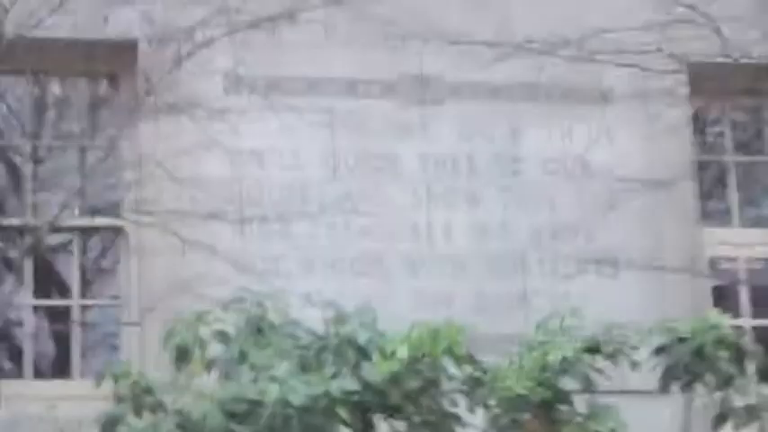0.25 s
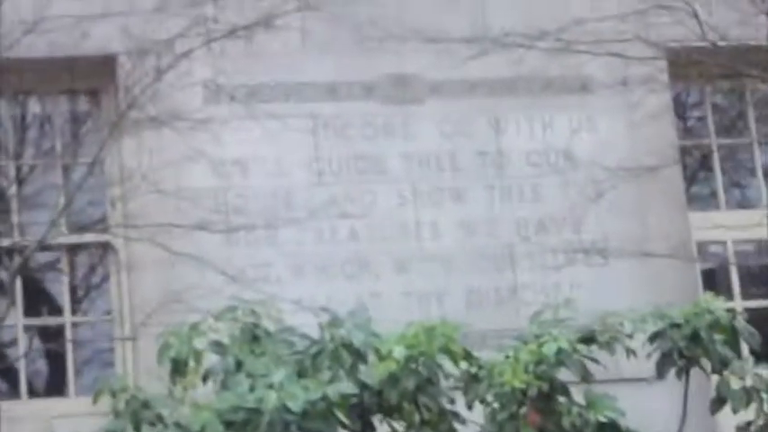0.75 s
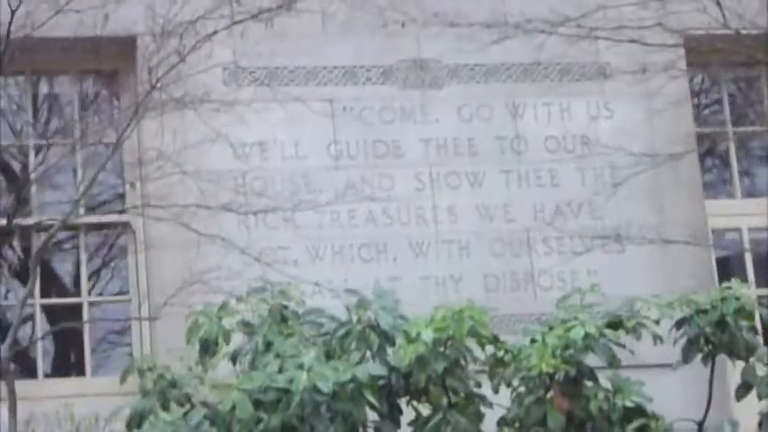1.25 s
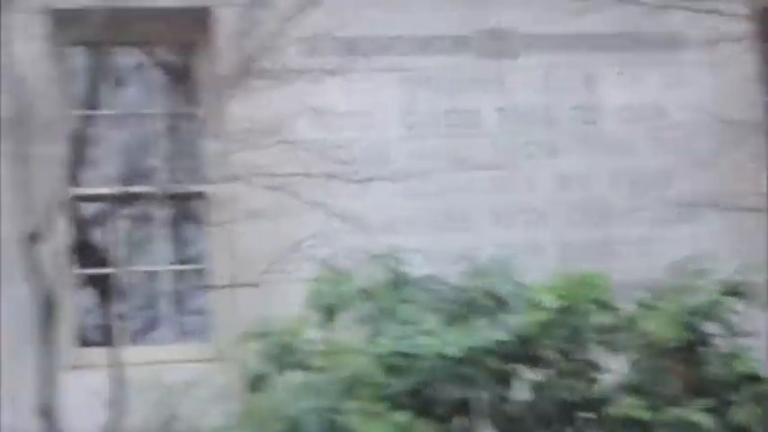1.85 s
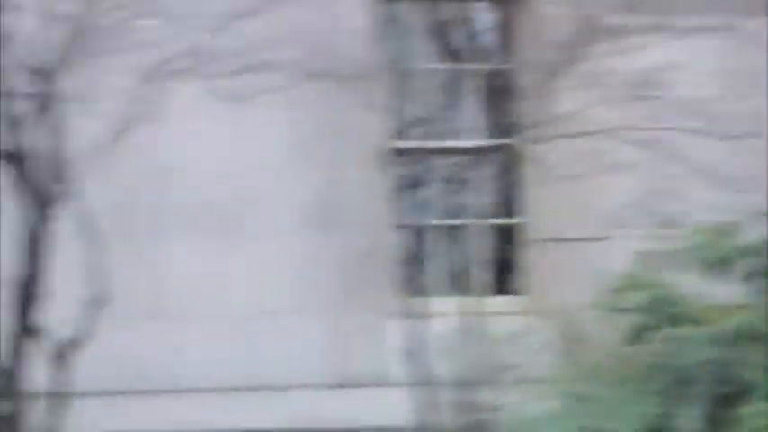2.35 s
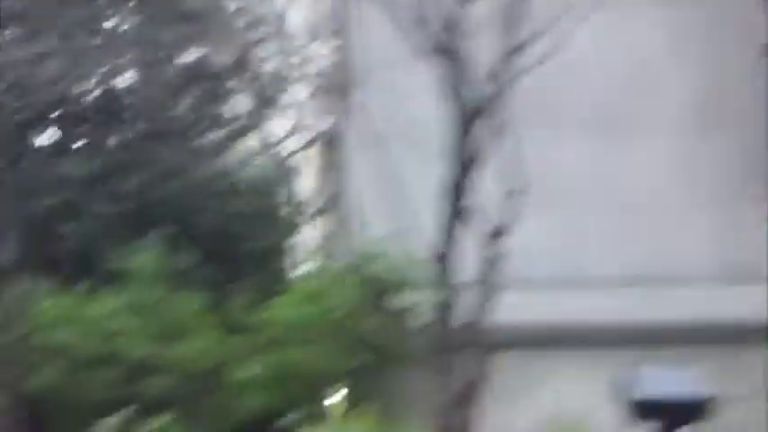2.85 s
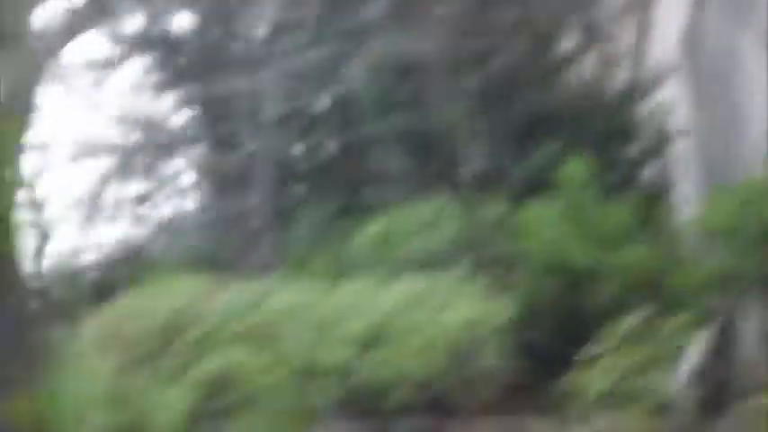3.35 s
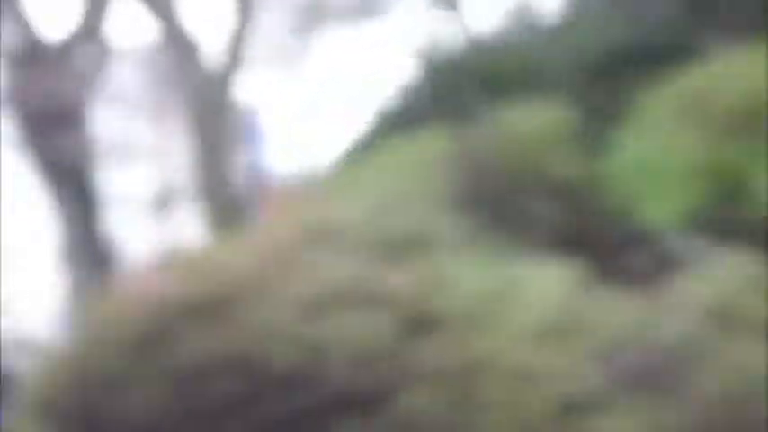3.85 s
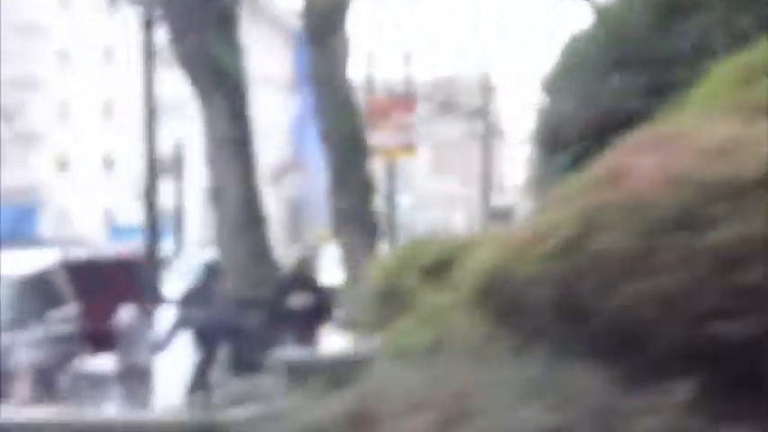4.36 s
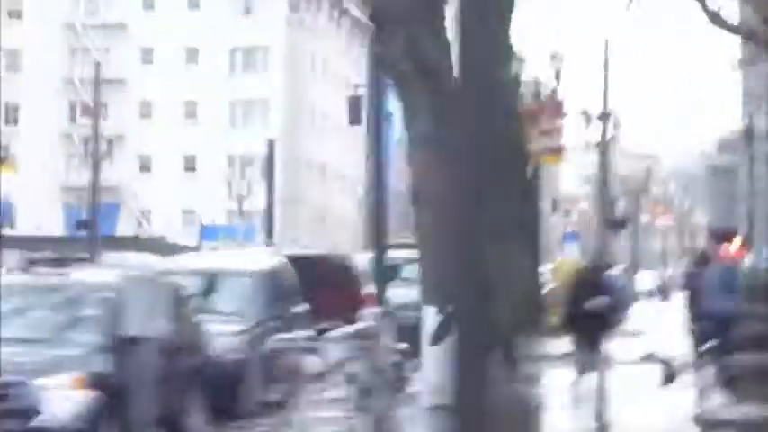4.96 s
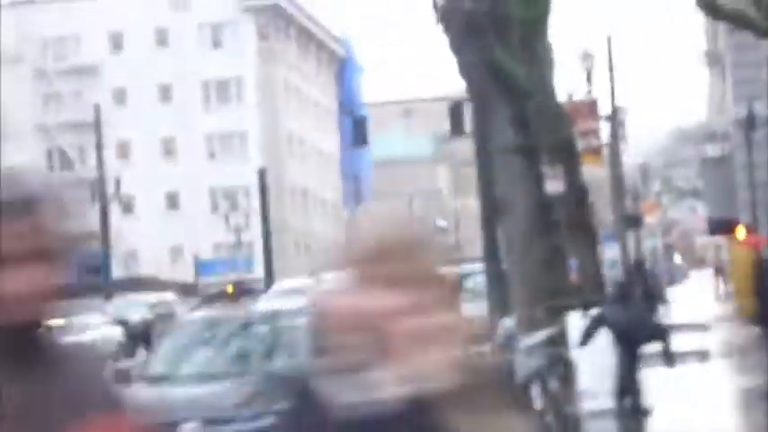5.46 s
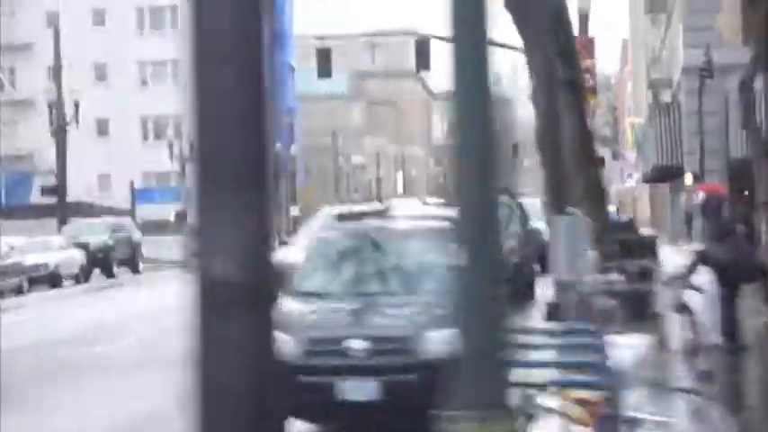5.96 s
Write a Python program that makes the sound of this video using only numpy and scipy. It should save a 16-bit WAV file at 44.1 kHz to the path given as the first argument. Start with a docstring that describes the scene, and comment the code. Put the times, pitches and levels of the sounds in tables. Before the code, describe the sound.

Nearly silent for the first 0.1 s, the sound fades in by 0.3 s to a deep, steady V8 idle, with a second vehicle humming very low nearby. Light clacks on pavement at 0.5-1.0 s surround a sharp tap with a hollow thump at 0.6 s. From 1.25 s the engine climbs quickly and works hard, its exhaust burbling, with rumble, rasp and a droning fan. Knocks recur near 2.0, 3.4, 4.8 and 6.1 s, the later ones weaker. Close plastic ticks fall at 2.3, 2.6 and 3.4 s, with a small creak at 4.1 s and more snaps to 5.9 s. The engine revs higher until 3.75 s, eases around 4.2-5 s, then rises again. Wet hiss swells near 3.6 s and broadly around 5.1 s, with brief fizzing splashes; clacks at 4.5-4.8 s echo off the house fronts. Hiss and engine continue to the end.

```python
"""A V8 idles in a wet city street, then pulls away with a burbling exhaust and a droning fan.
Sines make the engine, the fan and a second idling engine; shaped noise makes the engine's rumble and rasp.
Patchy noise swells and sinks, as from tyres on the wet road or the engine's own rasp, with small splashes.
A hollow knock of fading sines repeats slowly, and a few clacks of noise echo off the house fronts.
The hand-held camera ticks as it is turned: short fading sines and bright cracks of noise."""
import sys
import numpy as np
from scipy import signal
from scipy.fft import rfft, irfft, next_fast_len
from scipy.io import wavfile
from scipy.ndimage import uniform_filter1d, map_coordinates

SR = 44100
rng = np.random.default_rng(int(sys.argv[2]) if len(sys.argv) > 2 else 0)


def generate_wav(sig):
    """Save sig (samples, or channels by samples) to the path in sys.argv[1] as 16-bit PCM at SR."""
    pcm = np.round(np.clip(np.atleast_2d(sig).T, -1, 1) * 32767).astype(np.int16)
    wavfile.write(sys.argv[1], SR, pcm)


N = 274302

IDLE_HZ = 49.2  # firing rate at idle

# low rumble of engine and road: (frequency [Hz], relative level [dB per Hz])
RUMBLE_SPECTRUM = [(15, -39), (32, -16.5), (52, -7), (95, -4.5), (160, 1), (230, -5.5), (330, -25.5),
                   (700, -44.5)]
# midrange of engine rasp and road roar: (frequency [Hz], relative level [dB per Hz])
ROAR_SPECTRUM = [(120, -22), (260, -0.5), (350, 0), (460, -4.5), (600, -2.5), (780, -6), (1200, -11.5),
                 (1800, -15.5), (4000, -42.5)]
# fizz of water: (frequency [Hz], relative level [dB per Hz])
SPRAY_SPECTRUM = [(2000, -35), (3600, 0.5), (4500, 3), (5400, 0.5), (6400, 0.5), (7000, -5.5),
                  (8000, -10.5)]
# bright edge of clacks and ticks: (frequency [Hz], relative level [dB per Hz])
CRACK_SPECTRUM = [(300, -16), (1000, -15), (2500, 4.5), (4500, 0.5), (6700, 1.5), (8000, -9.5)]


def amp(db):
    """Turn decibels into a gain."""
    return 10 ** (np.asarray(db) / 20)


def unit(x):
    """Scale x to an rms (average strength) of 1."""
    return x / np.sqrt(np.mean(x ** 2) + 1e-20)


def along(points, hz):
    """Read a table of (frequency [Hz], value) at any frequency, on a log axis."""
    f, v = np.transpose(points)
    return np.interp(np.log(hz + 1), np.log(f + 1), v)


def curves(rows):
    """Draw one value per sample for each column after the time."""
    s, *cols = np.transpose(rows)
    return [np.interp(np.arange(N) / SR, s, c) for c in cols]


def wobble(rate):
    """A smooth random curve through `rate` random points a second."""
    points = rng.standard_normal(int(N * rate / SR) + 4)
    return map_coordinates(points, [np.arange(N) * rate / SR])


def filtered(x, response):
    """Multiply the spectrum of x by a response, given as a function of frequency."""
    m = next_fast_len(N + SR // 2)
    hz = np.fft.rfftfreq(m, 1 / SR)
    return irfft(rfft(x, m) * response(hz), m)[:N]


def coloured(x, spectrum):
    """Shape x by a spectrum table and bring it to rms 1."""
    return unit(filtered(x, lambda hz: amp(along(spectrum, hz))))


def rush(spectrum, patchy_db):
    """Noise of rms 1 whose gain varies in random patches of time and pitch."""
    z = signal.stft(rng.standard_normal(N), nperseg=1024)[2]
    patches = uniform_filter1d(rng.standard_normal(z.shape), size=9, axis=0)
    patches = uniform_filter1d(patches, size=8, axis=1)
    noise = signal.istft(z * amp(patchy_db * unit(patches)))[1][:N]
    return coloured(noise, spectrum)


def fade(t, t60):
    """A steady decay that loses 60 dB in t60 seconds."""
    return np.exp(-np.log(1000) * t / t60)


def tone(phase):
    """A sine of rms 1 that starts anywhere in its cycle."""
    return np.sqrt(2) * np.sin(phase + rng.uniform(0, 2 * np.pi))


def ring(modes, t):
    """A struck body rings at several pitches, each fading, with slightly new strengths each time."""
    scatter_db = 1.2
    out = 0
    for hz, db, t60 in modes:
        strength = amp(db + scatter_db * rng.standard_normal())
        out = out + strength * fade(t, t60) * np.sin(2 * np.pi * hz * t)
    return out


def add(track, s, sound):
    """Mix a sound into the track at time s, in seconds."""
    part = track[round(s * SR):][:len(sound)]
    part += sound[:len(part)]


def drive():
    """The driver's part: the engine's firing rate in Hz and how hard it works in dB."""
    pull_away_s = 1.25  # the firing rate starts to climb
    # engine speed once under way: (time [s], firing rate [Hz])
    speed = [(1.32, 52.6), (1.45, 59.0), (1.55, 63.6), (1.65, 65.2), (1.81, 67.1), (2.39, 63.6),
             (2.83, 66.2), (3.1, 72.4), (3.75, 78.6), (4.2, 73.4), (4.95, 73.0), (5.3, 79.8), (5.56, 79.8),
             (5.9, 81.3), (6.2, 81.5)]
    # how hard the engine works: (time [s], level against full load [dB])
    load = [(1.1, -12), (1.5, -0.5), (2.05, -1), (2.8, -0.5), (3.05, 1.5), (3.27, 0.4), (3.98, 0),
            (4.28, -5), (4.92, -8.5), (5.3, -7.5), (6.2, -4.5)]
    firing_hz, = curves([(pull_away_s, IDLE_HZ), *speed])
    load_db, = curves(load)
    return firing_hz, load_db


def engine(firing_hz, load_db):
    """Eight firings a cycle; the two banks fire unevenly, which sounds the other multiples of the cycle."""
    # the burble's tones: (multiple of the four-stroke cycle rate, level against the burble [dB])
    burble_orders = [(5, 1), (6, -10.5), (7, -24), (9, -19), (11, -11.5), (13, -27), (14, -33), (15, -17),
                     (18, -10), (19, -25), (21, -17)]
    # resonances that the firing tone and its octave sweep through: (frequency [Hz], level [dB])
    exhaust = [(49, -2), (63, 0.5), (72, -7.5), (79, -2.5), (84, -13.5), (100, -9.5), (115, -3.5),
               (128, -9.5), (136, -6.5), (145, -8), (149, 0.5), (156, 2.5), (165, 0.5)]
    firing_db, octave_db = -29.4, -30.2  # at full load, before the exhaust's resonances
    burble_idle_db, burble_db_per_hz = -58, 0.8239  # full load at idle speed; growth with the firing rate

    phase = 2 * np.pi * np.cumsum(firing_hz) / SR + .05 * wobble(12)
    cycle = phase / 8
    firing_gain = amp(firing_db + along(exhaust, firing_hz) + 0.23 * wobble(30))
    firing = firing_gain * tone(phase)
    octave_gain = amp(octave_db + along(exhaust, 2 * firing_hz) + 0.27 * wobble(15))
    octave = octave_gain * tone(2 * phase)
    burble = sum(amp(db + 0.74 * wobble(4.5)) * tone(round(k) * cycle) for k, db in burble_orders)
    burble_db = burble_idle_db + burble_db_per_hz * (firing_hz - IDLE_HZ)
    return amp(load_db) * (firing + octave + amp(burble_db) * burble)


def engine_noise(load_db):
    """Low rumble and a midrange rasp swell with the engine's load, but less than its tones do."""
    rumble_db, rumble_load_share = -38, 0.59  # level at full load; share of the load's dB that it follows
    rasp_db, rasp_load_share = -42.5, 0.47
    rumble = amp(rumble_db + rumble_load_share * load_db) * rush(RUMBLE_SPECTRUM, patchy_db=0.5)
    rasp = amp(rasp_db + rasp_load_share * load_db) * rush(ROAR_SPECTRUM, patchy_db=-0.2)
    return rumble + rasp


def fan(firing_hz):
    """The cooling fan slips on its clutch, so its blade tone does not quite follow the engine."""
    # the engine bay lets the tone out best at the higher rates: (blade rate [Hz], level [dB])
    fan_response = [(143, -49), (160, -51), (175, -45.5), (185, -36.5), (200, -37.5), (211, -36),
                    (220, -37.5)]
    # blade rate over firing rate at idle; its loss as the engine speeds up
    idle_ratio, slip_per_hz = 2.89, 0.0055
    ratio = idle_ratio - slip_per_hz * (firing_hz - IDLE_HZ)
    blade_hz = firing_hz * ratio
    phase = 2 * np.pi * np.cumsum(blade_hz) / SR + .15 * wobble(22)
    flutter_db = .9 * wobble(18)
    return amp(along(fan_response, blade_hz) + flutter_db) * tone(phase)


def idler():
    """A second vehicle standing nearby hums on low tones whose phase drifts slowly."""
    # (frequency [Hz], level [dB])
    hums = [(36.5, -54.5), (58.4, -51.5)]
    t = np.arange(N) / SR
    return sum(amp(db) * tone(2 * np.pi * hz * t + 0.22 * wobble(0.52)) for hz, db in hums)


def road_swells():
    """Noise in four layers, rumble, roar, hiss and fine spray, rises and falls in overlapping swells."""
    # swells of rumble, roar and hiss, from passing tyres or the engine's own rasp:
    # (time of the peak [s], level [dB], time from peak to half power [s], spray against hiss [dB])
    swells = [(1.951, -14, 0.45, -6), (3.55, -3, 0.36, -13), (5.1, 0.5, 0.84, -4), (6.2, -3, 0.54, -9.5)]
    # (frequency [Hz], relative level [dB per Hz])
    hiss_spectrum = [(600, -3), (1300, 1.5), (1600, 1), (2200, 0), (3100, 0.5), (3800, -3.5), (5000, -22),
                     (8000, -34.5)]
    rumble_db, roar_db, hiss_db = -43, -44, -40.5  # before each swell's own level
    spray_falloff = 1.035  # spray's dB drop away from the peak, as a multiple of the other layers'

    t = np.arange(N) / SR
    rush_power, spray_power = 0, 0
    for s, db, width, spray_db in swells:
        shape = 1 / (1 + ((t - s) / width) ** 2)
        rush_power += amp(db) ** 2 * shape
        spray_power += amp(db + spray_db) ** 2 * shape ** spray_falloff

    flutter_db = .5 * wobble(30) + .35 * wobble(7)
    rumble = amp(rumble_db) * rush(RUMBLE_SPECTRUM, patchy_db=-2.0)
    roar = amp(roar_db) * rush(ROAR_SPECTRUM, patchy_db=1.9)
    hiss = amp(hiss_db) * rush(hiss_spectrum, patchy_db=1.37)
    drops = rng.standard_normal(N) * (rng.random(N) < 900 / SR)  # about 900 a second
    fizz = rush(SPRAY_SPECTRUM, patchy_db=1.3) + 0.43 * coloured(drops, SPRAY_SPECTRUM)
    spray = amp(hiss_db) * fizz
    layers = np.sqrt(rush_power) * (rumble + roar + hiss)
    return amp(flutter_db) * (layers + np.sqrt(spray_power) * spray)


def clacks():
    """Hard, ringless contacts on the pavement: bursts of noise whose bright edge dies first."""
    # (time [s], level [dB], time to fade by 60 dB [s], bright edge against body [dB])
    contacts = [(.526, -32.5, 0.12, -10.5), (.696, -35.5, 0.14, -23.5), (0.8658, -36, 0.17, -15),
                (0.87, -38, 0.048, -4), (1.043, -47, 0.073, -25), (3.713, -34.5, 0.18, -25),
                (4.528, -33, 0.15, -31), (4.72, -36.5, 0.047, -16), (4.755, -27, 0.045, -10),
                (4.789, -35, 0.12, -11)]
    # (frequency [Hz], relative level [dB per Hz])
    body_spectrum = [(150, -25.5), (500, 2), (900, -1.5), (1500, -8), (2300, -10), (3200, -21.5),
                     (7000, -35)]
    body, edge, t = np.zeros(N), np.zeros(N), np.arange(SR // 4) / SR
    attack = 1 - np.exp(-t / .0007)
    for s, db, t60, edge_db in contacts:
        add(body, s, amp(db) * fade(t, t60) * attack)
        add(edge, s, amp(db + edge_db) * fade(t, 0.53 * t60))
    body_noise = coloured(rng.standard_normal(N), body_spectrum)
    edge_noise = coloured(rng.standard_normal(N), CRACK_SPECTRUM)
    return body * body_noise + edge * edge_noise


def knocks():
    """A tap and a hollow thump at an even slow pace, perhaps a wiper at the end of its sweep."""
    # (time [s], thump level [dB], sharp tap level [dB])
    strokes = [(0.5946, -20.7, -12), (1.9825, -18, -18), (3.372, -21.5, -22), (4.759, -32, -29),
               (6.1437, -29, -19)]
    # the hollow body's pitches: (frequency [Hz], level [dB], time to fade by 60 dB [s])
    thump_modes = [(173, -18.5, .11), (280, -8.5, 0.095), (345, -2.5, 0.05), (433.5, -1.5, 0.05),
                   (590, -7.5, 0.032), (800, -11.5, .025)]
    out, t = np.zeros(N), np.arange(SR // 4) / SR
    tap_hz = 1000
    tap = np.sin(2 * np.pi * tap_hz * t) * fade(t, 0.0043) * (1 - np.exp(-t / 0.00037))
    for s, db, tap_db in strokes:
        thump = ring(thump_modes, t) * (1 - np.exp(-t / 0.0016))
        add(out, s, amp(db) * thump + amp(tap_db) * tap)
    return out


def street(x):
    """The house fronts answer with a tail of fading noise, the treble dying first."""
    # (frequency [Hz], time to fade by 60 dB [s])
    echo_fade = [(150, 0.66), (1500, 0.2), (7000, 0.048)]
    hz, t, z = signal.stft(rng.standard_normal(SR // 2), SR, nperseg=256)
    tail = signal.istft(z * fade(t, along(echo_fade, hz)[:, None]))[1]
    return signal.fftconvolve(x, tail / np.linalg.norm(tail))[:N]


def ticks():
    """The plastic case snaps and creaks in the hand: light slips are mostly a bright crack."""
    # (time [s], level [dB], brightness [0-1], number of slips)
    snaps = [(2.2626, -16.5, 0.11, 1), (2.2668, -23, 0.8, 1), (2.6407, -26.5, 0.5, 1), (3.419, -34.5, 1, 1),
             (4.072, -28, 0.8, 2), (4.1183, -27, 1, 5), (4.6936, -24.5, 0.88, 1), (4.8887, -20.5, 0.6, 1),
             (5.854, -32, 0.84, 1)]
    # the case's pitches: (frequency [Hz], level [dB], time to fade by 60 dB [s])
    case_modes = [(620, -8.5, .016), (1176, -9, 0.024), (1640, -17.5, 0.041), (2280, -12, 0.021),
                  (2940, -1, 0.01), (4590, -10, 0.012), (6560, -14.5, 0.0072)]
    slip_gap_s = 0.009  # between the slips of a creak
    body, crack, t = np.zeros(N), np.zeros(N), np.arange(SR // 16) / SR
    for start, db, bright, slips in snaps:
        bright = np.clip(bright, 0, 1)
        for s in start + slip_gap_s * np.arange(round(slips)):
            add(body, s, amp(db) * (1 - bright) * ring(case_modes, t))
            add(crack, s, amp(db - 2.5) * bright * fade(t, 0.016))
    return body + crack * coloured(rng.standard_normal(N), CRACK_SPECTRUM)


def splashes():
    """Water squirts from under a tyre: short soft swells of fizzing noise."""
    # (time of the peak [s], level [dB], spread of the bell-shaped swell [s])
    squirts = [(3.24, -48.5, 0.035), (4.562, -44, 0.0062), (4.882, -46.5, 0.01), (4.947, -40, .016),
               (5.281, -37, .007), (5.415, -42.5, 0.009), (6.022, -40.5, 0.018)]
    t = np.arange(N) / SR
    swell = sum(amp(db) * np.exp(-((t - s) / length) ** 2 / 2) for s, db, length in squirts)
    return swell * coloured(rng.standard_normal(N), SPRAY_SPECTRUM)


def scene():
    """Add up everything that reaches the camera; only the knocks and clacks get an echo."""
    firing_hz, load_db = drive()
    vehicle = engine(firing_hz, load_db) + engine_noise(load_db) + fan(firing_hz)
    hits = clacks() + knocks()
    echo = amp(-13.5) * street(hits)
    mix = vehicle + idler() + road_swells() + hits + echo + ticks() + splashes()
    return mix[None]


def record(dry):
    """The camera fades in, has a narrow notch in the treble and a low band limit."""
    notch_hz, notch_width_hz, top_hz = 5425, 430, 7580  # nothing passes from top_hz up
    # (frequency [Hz], level [dB])
    treble_edge = [(6500, -0.5), (7000, -4.5), (7300, -12.5), (7600, -24.5)]
    # (time [s], level [dB])
    opening = [(0, -66), (.085, -65), (.12, -21), (.17, -10), (.24, -4), (.33, 0)]

    def response(hz):
        """Notch, treble roll-off and sharp upper limit together."""
        offset = notch_hz ** 2 - hz ** 2
        notch = offset / (offset + 1j * hz * notch_width_hz)
        return notch * amp(along(treble_edge, hz)) * (hz < top_hz)

    opening_db, = curves(opening)
    return filtered(dry[0] * amp(opening_db), response)[None]


dry = scene()
out = record(dry)
generate_wav(out)
```